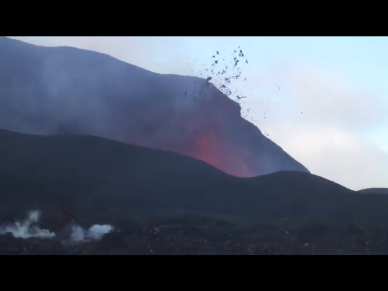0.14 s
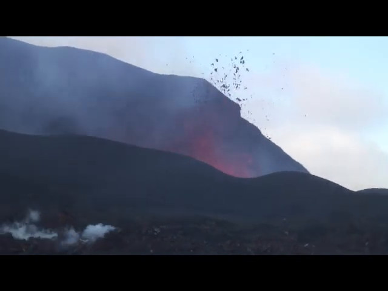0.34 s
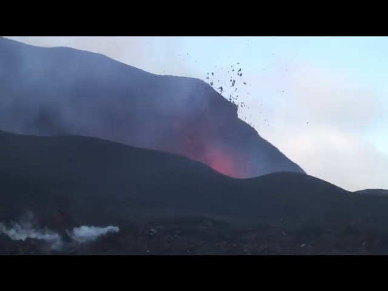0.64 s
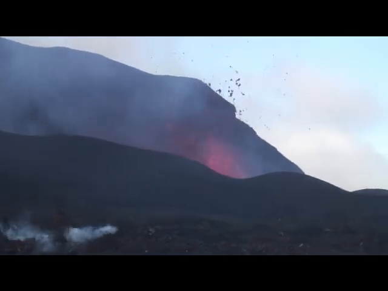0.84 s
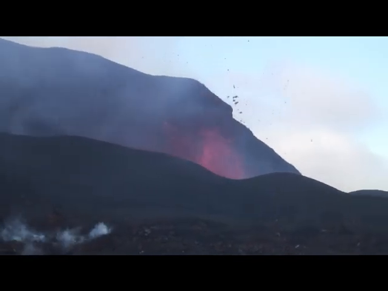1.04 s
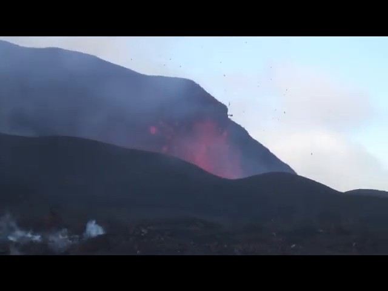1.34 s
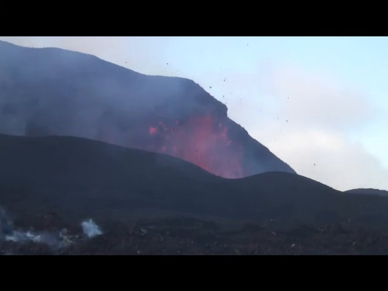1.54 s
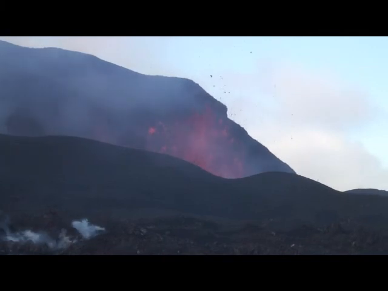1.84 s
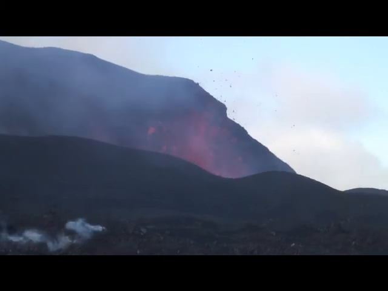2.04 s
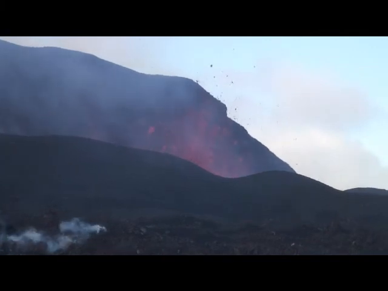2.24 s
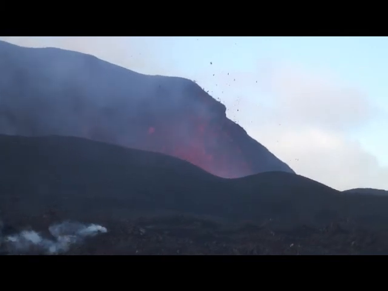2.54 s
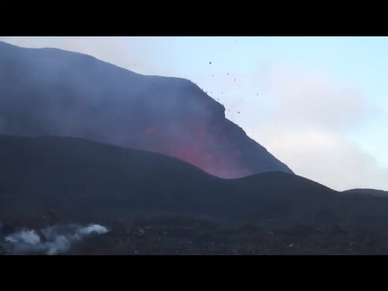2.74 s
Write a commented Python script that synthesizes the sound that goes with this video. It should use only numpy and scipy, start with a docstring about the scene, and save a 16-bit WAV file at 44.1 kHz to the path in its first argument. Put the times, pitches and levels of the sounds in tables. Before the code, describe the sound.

Erupting volcano's low, grainy roar surges and eases under gusty wind, briefly cut to silence

```python
"""An erupting volcanic vent heard across open ground, with a burst already under way at the start.
Gas surges through the lava as dense swarms of pops, filtered by the hollow crater, over a slowly easing roar.
Wind, as shaped noise, hisses and buffets the microphone throughout.
Near one second all sound cuts out for a quarter of a second, leaving a brief faint trail.
The surges then resume, and the wind eases in the second half."""
import sys
import numpy as np
from scipy.fft import rfft, irfft, next_fast_len
from scipy.io import wavfile
from scipy.ndimage import map_coordinates

SR = 44100
rng = np.random.default_rng(int(sys.argv[2]) if len(sys.argv) > 2 else 0)


def dump(signal):
    """Clip the signal to [-1, 1] and save it as 16-bit WAV at the path in sys.argv[1]."""
    limited = np.clip(np.atleast_2d(signal).T, -1, 1)
    pcm = np.round(limited * 32767).astype(np.int16)
    wavfile.write(sys.argv[1], SR, pcm)


N = 127890  # samples, about 2.9 s


def amp(db):
    """Logarithmic level: decibels to amplitude gain."""
    return 10 ** (np.asarray(db) / 20)


def unit(x):
    """Normalisation: scales x to rms 1."""
    return x / np.sqrt(np.mean(x ** 2) + 1e-20)


def seconds():
    """Sampling: the time of each sample in seconds."""
    return np.arange(N) / SR


def wobble(rate):
    """Slow random modulation: a smooth curve through rate random knots per second."""
    knots = rng.standard_normal(N // 20)
    return map_coordinates(knots, [seconds() * rate], mode="mirror")


def coloured(x, points):
    """Minimum-phase filtering: folding the cepstrum makes a causal response from (f, level) points; rms 1."""
    m = 2 * next_fast_len(N // 2 + SR // 4)  # padded, even length
    hz, db = np.transpose(points)
    log_hz = np.log(np.fft.rfftfreq(m, 1 / SR) + 1)
    gain_db = np.interp(log_hz, np.log(hz + 1), db)
    cepstrum = irfft(np.log(amp(gain_db)), m)
    cepstrum[1:m // 2] *= 2
    cepstrum[m // 2 + 1:] = 0
    response = np.exp(rfft(cepstrum))
    return unit(irfft(rfft(x, m) * response, m)[:N])


def noise(points):
    """Spectral shaping: white Gaussian noise filtered to the given spectrum, at rms 1."""
    return coloured(rng.standard_normal(N), points)


# Gas bursts: start t/s, rise t/s, hold t/s, fall rate/(dB/s), level/dB at full swell,
# tearing level/dB relative to the hollow sound
GAS_BURSTS = [ (-.05, 0.089, 0.022, 84, -27.5, -10.5), (0.297, 0.071, .05, 67, -29.5, -5),
              (1.223, 0.14, 0.11, 48, -35.5, -3), (2.123, 0.1, 0.058, 50, -35.5, 0),
              (2.425, 0.064, 0.13, 66, -30, 1), ]
# Hollow response of the crater: f/Hz, relative level/dB per Hz
CRATER_SPECTRUM = [(40, -55), (120, -21.5), (240, -16.5), (330, -3), (430, -1), (590, -2), (780, -6.5),
                   (1200, -14), (2000, -29.5), (4000, -65), (8000, -85)]
# Gas tearing through the lava: f/Hz, relative level/dB per Hz
TEARING_SPECTRUM = [(200, -23.5), (500, 3.5), (850, 3), (1400, 1), (1750, -5), (2100, -11), (2550, -13.5),
                    (3100, -24), (4000, -32), (5000, -40.5), (7000, -56), (13000, -77)]


def gas_bursts():
    """Source-filter principle: one flow drives crater and tearing; each burst swells, holds and decays."""
    t, out = seconds(), np.zeros(N)
    flow = escaping_gas()
    hollow = coloured(flow, CRATER_SPECTRUM)
    tearing = coloured(flow, TEARING_SPECTRUM)
    for start, rise, hold, fall, level_db, bright_db in GAS_BURSTS:
        attack = np.clip((t - start) / rise, 0, 1)
        decay = amp(-fall * np.maximum(t - start - rise - hold, 0))
        timbre = unit(hollow + amp(bright_db) * tearing)
        out += amp(level_db) * attack * decay * timbre
    return out


POPS_PER_S, POP_SPREAD_DB = 1200, 2.5  # mean pop rate; spread in pop level
TURBULENT_SHARE = 0.48  # fraction of the power that is turbulence
SPUTTER_HZ, SPUTTER_DB = 70, 0.47  # knots per second and depth of the jet's sputter


def escaping_gas():
    """Shot noise: random pops of uneven size add to turbulence, and the sputter modulates both."""
    popping = rng.random(N) < POPS_PER_S / SR
    pops = popping * amp(POP_SPREAD_DB * np.clip(rng.standard_normal(N), -2, 2))
    turbulence = rng.standard_normal(N)
    flow = np.sqrt(1 - TURBULENT_SHARE) * unit(pops - pops.mean()) + np.sqrt(TURBULENT_SHARE) * turbulence
    return flow * amp(SPUTTER_DB * wobble(SPUTTER_HZ))


# Roar of the vent: f/Hz, relative level/dB per Hz
ROAR_SPECTRUM = [(25, -49.5), (60, -32), (110, -11.5), (200, -4.5), (400, 0.5), (580, -1), (850, -4.5),
                 (1600, -12), (2600, -19), (3600, -32), (5000, -44.5), (9000, -58.5)]
ROAR_START_DB, ROAR_EASES_DB_PER_S = -37.5, 1.39


def vent_roar(churn_db=0.17, churn_hz=9):
    """Broadband jet noise: a continuous gas flow shaped by the roar spectrum, its level falling steadily in dB."""
    level_db = ROAR_START_DB - ROAR_EASES_DB_PER_S * seconds() + churn_db * wobble(churn_hz)
    return amp(level_db) * coloured(escaping_gas(), ROAR_SPECTRUM)


# Wind strength: t/s, relative level/dB
WIND_STRENGTH = [(0, 6.5), (.08, 4), (.25, -1), (.48, -2.5), (.66, 1), (.86, 0.5), (.97, 0.5), (1.28, 2),
                 (1.36, -1), (1.5, -0.5), (1.63, -5), (1.85, -7), (2.1, -10), (2.4, -20.5), (2.9, -14.5)]
# Wind rushing past the microphone: f/Hz, relative level/dB per Hz
RUSH_SPECTRUM = [(100, -10), (400, 8), (900, -0.5), (1650, 4.5), (2100, -1), (2650, -2.5), (3150, -7.5),
                 (3650, -9.5), (4200, -20.5), (5000, -25), (8000, -27), (10500, -33), (13000, -39)]
# Buffeting of the microphone: f/Hz, relative level/dB per Hz
BUFFET_SPECTRUM = [(20, -37.5), (35, -29.5), (55, -8), (90, 1.5), (170, 0), (300, 3), (700, -20),
                   (2000, -63)]
RUSH_DB, BUFFET_DB = -45, -45.5  # levels at 0 dB wind strength
BUFFET_GROWS = .85  # dB of buffeting per dB of wind strength
LUMP_DB, LUMP_HZ = 2, 16  # depth and knots per second of the buffeting's unevenness


def wind(flutter_db=1.1, flutter_hz=40):
    """Flow noise with a common modulator: one strength drives the airy rush and the lumpy low buffeting."""
    strength_db = np.interp(seconds(), *np.transpose(WIND_STRENGTH))
    rush_db = RUSH_DB + strength_db + flutter_db * wobble(flutter_hz)
    rush = amp(rush_db) * noise(RUSH_SPECTRUM)
    lumps = unit(amp(LUMP_DB * wobble(LUMP_HZ)) * noise(BUFFET_SPECTRUM))
    buffeting = amp(BUFFET_DB + BUFFET_GROWS * strength_db) * lumps
    return rush + buffeting


# Faint wisps of high hiss: centre t/s, Gaussian half length t/s, centre f/Hz,
# half width f/Hz, level/dB before the Gaussian envelope
HISS_WISPS = [(.965, 0.042, 9100, 1700, -70), (1.45, .04, 7700, 250, -79), (2.165, 0.024, 9050, 260, -76.5)]


def wisps():
    """Band-limited noise: each brief wisp has a resonance-shaped band and a Gaussian envelope."""
    t, hz, out = seconds(), np.fft.rfftfreq(N, 1 / SR), np.zeros(N)
    for centre, half, pitch_hz, width_hz, level_db in HISS_WISPS:
        resonance = 1 / (1 + ((hz - pitch_hz) / width_hz) ** 2)
        band = irfft(rfft(rng.standard_normal(N)) * resonance, N)
        envelope = np.exp(-((t - centre) / half) ** 2 / 2)
        out += amp(level_db) * envelope * unit(band)
    return out


# Microphone self-noise: f/Hz, relative level/dB per Hz
HISS_SPECTRUM = [(100, 0), (5000, -0.56), (9000, -1), (13000, -2)]


def microphone_hiss(level_db=-74):
    """Self-noise: stationary, nearly white noise sets the background floor."""
    return amp(level_db) * noise(HISS_SPECTRUM)


def scene():
    """Linear superposition: vent, wind and faint hisses add at one microphone."""
    vent = gas_bursts() + vent_roar()
    return (vent + wind() + wisps() + microphone_hiss())[None]


DROPOUT_START_S, DROPOUT_END_S, EDGE_S = 1.0195, 1.2705, .002  # silence and its edge smoothing
TRAIL_DB, TRAIL_S = -32, 0.0264  # faint trail as the dropout begins
TOP_HZ = 13150  # band limit


def record(dry):
    """Gating and band limiting: the sound drops out once, and nothing is kept above the limit."""
    t, m = seconds(), next_fast_len(N + SR // 2)
    trail = amp(TRAIL_DB) * (t < DROPOUT_START_S + TRAIL_S)
    gate = np.where((t < DROPOUT_START_S) | (t > DROPOUT_END_S), 1., trail)
    edge = np.hanning(round(EDGE_S * SR))
    live = np.convolve(gate, edge / edge.sum(), "same")
    passband = np.fft.rfftfreq(m, 1 / SR) < TOP_HZ
    return irfft(rfft(dry * live, m) * passband, m)[:, :N]


dry = scene()
out = record(dry)
dump(out)
```